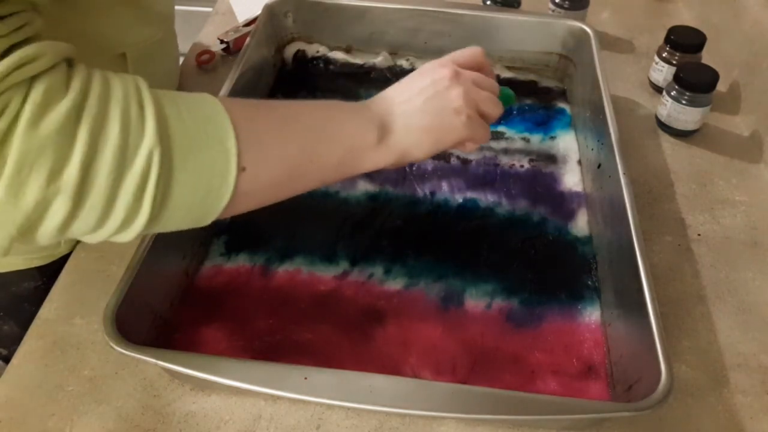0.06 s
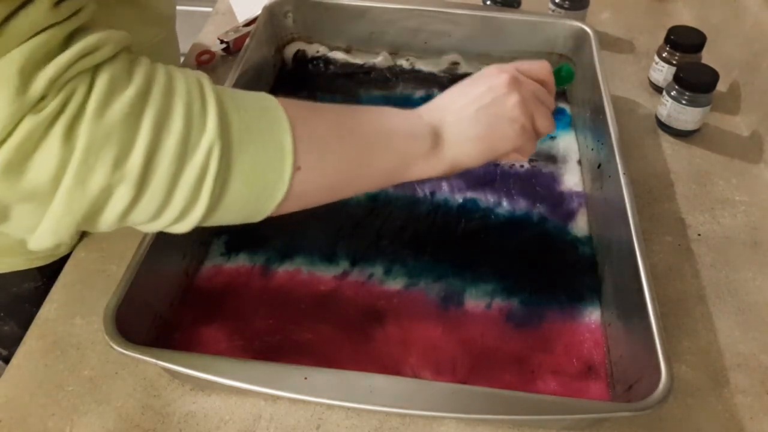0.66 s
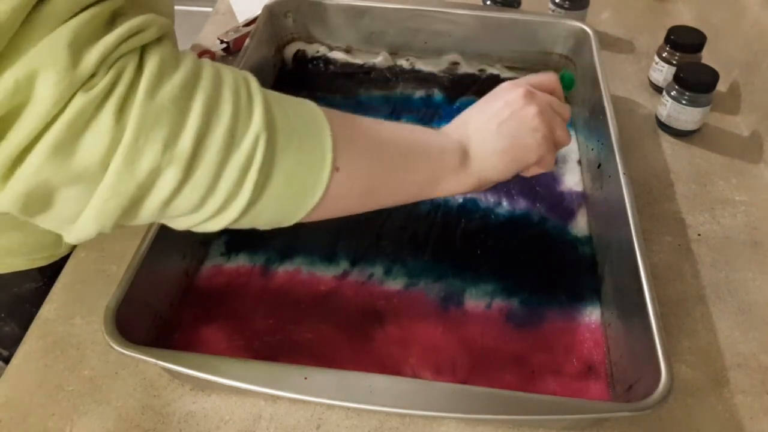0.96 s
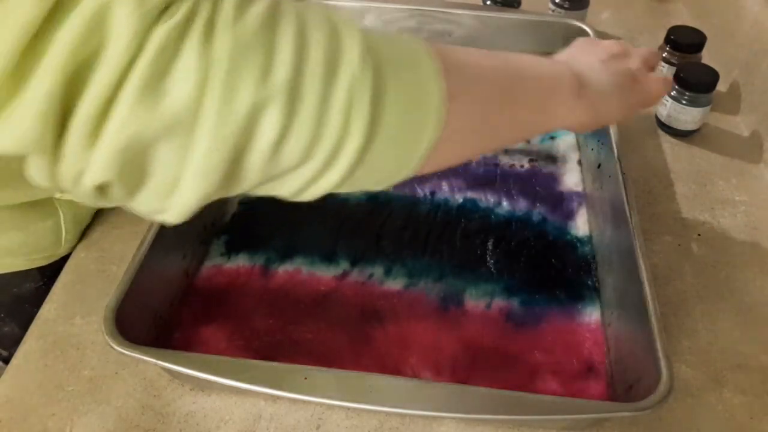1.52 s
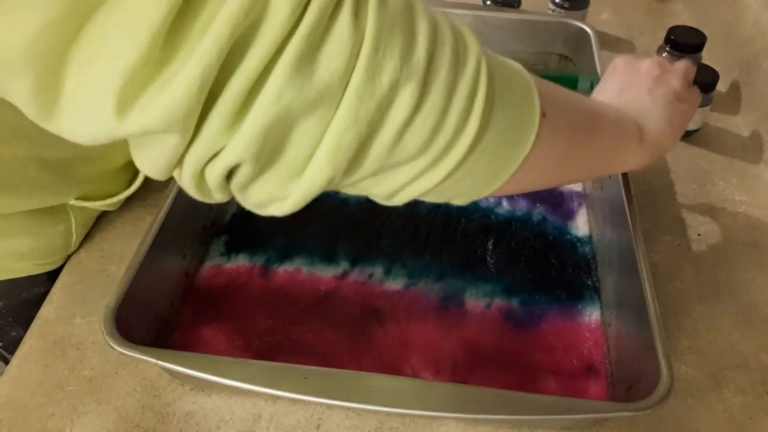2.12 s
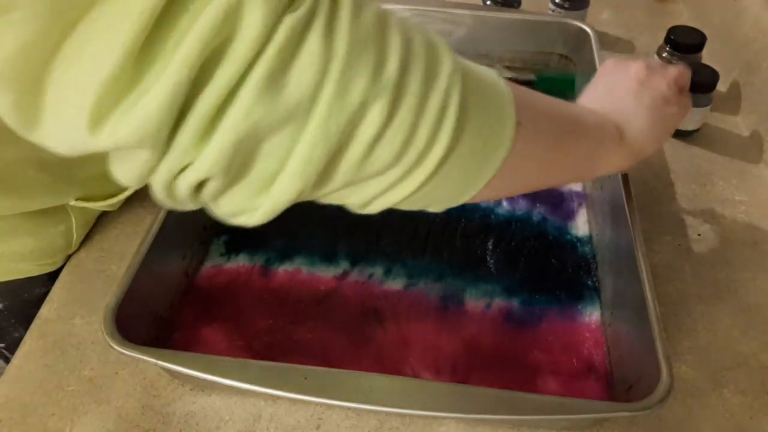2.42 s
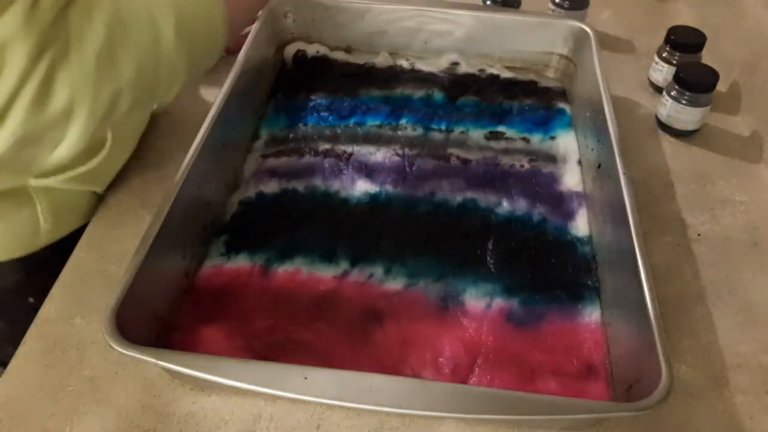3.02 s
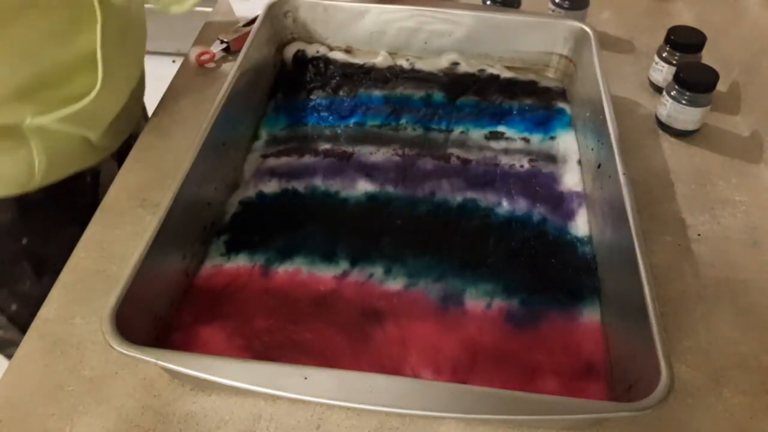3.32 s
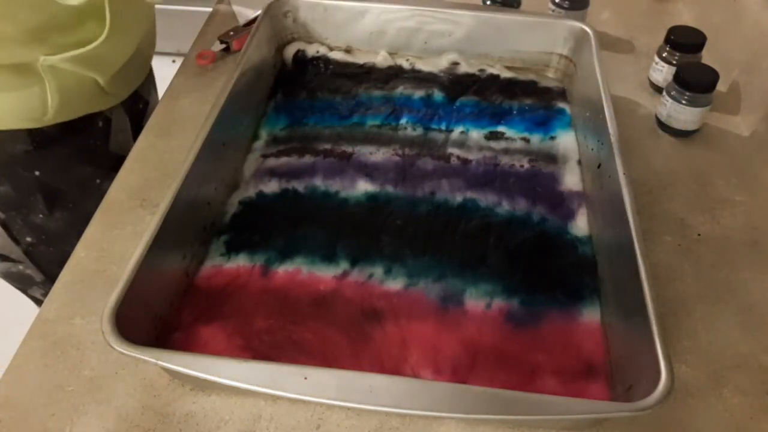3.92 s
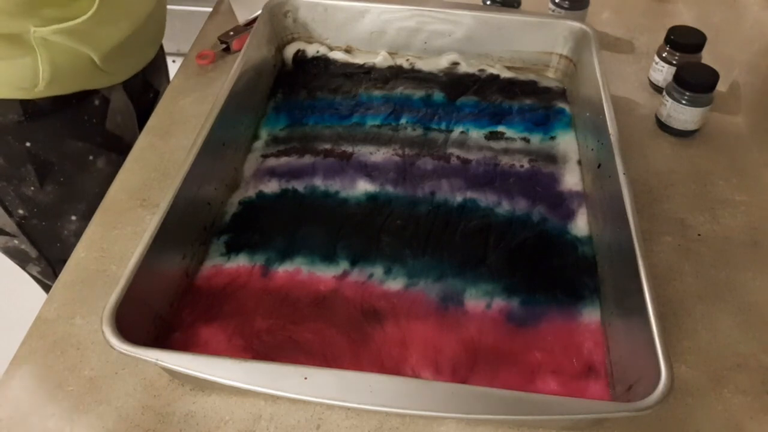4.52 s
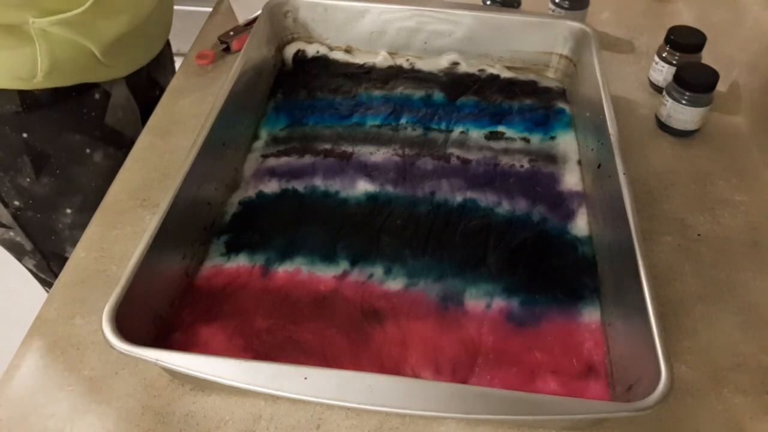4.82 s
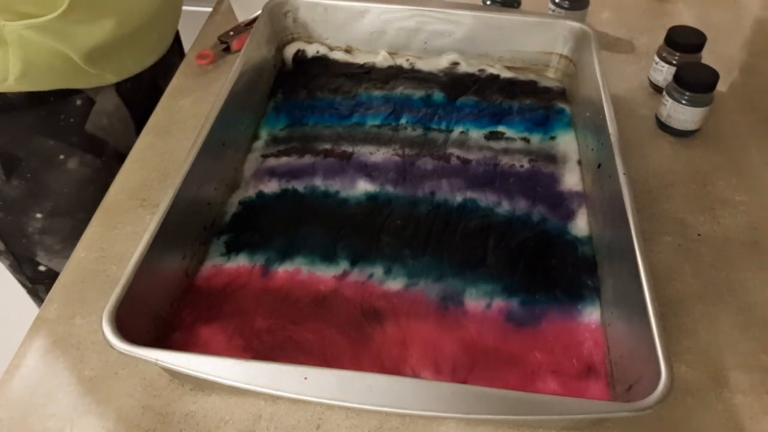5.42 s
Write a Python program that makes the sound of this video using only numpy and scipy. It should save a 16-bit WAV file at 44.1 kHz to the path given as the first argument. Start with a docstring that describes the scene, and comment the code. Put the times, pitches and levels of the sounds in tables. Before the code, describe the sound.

A low rumble and faint electrical hum run throughout in a small, fairly live room. At about 0.9 seconds there is a short, soft swish. From 1.9 to 2.4 seconds a plastic measuring spoon raps four times on the rim of a steel pan, close to the microphone and quickening slightly. These are the loudest sounds: sharp, bright knocks, each with a brief damped metal ring and a little room echo. Clothing rustles faintly afterwards. Near 3.4 seconds comes one crisp, lighter plastic click, farther off and slightly to the right, then a run of small ticks that quicken and fade until about 3.9 seconds, like a jar lid being turned. Another click falls at 4.3 seconds, followed by a cluster of light clicks and short, grainy scrapes from 4.5 to 5.1 seconds as small things are handled. One last click comes at about 5.6 seconds.

```python
"""A short swish, then four sharp raps: a plastic measuring spoon knocks dye powder off on the rim of
a steel pan of wet fiber. Each impact excites damped modes of the spoon, the pan and the table below.
Light clicks and scrapes follow, the impacts and friction of small things handled off to the side.
A small, fairly live room reverberates after each sound, over a low rumble and a faint mains hum."""
import sys
import numpy as np
from scipy import signal
from scipy.fft import rfft, irfft, next_fast_len
from scipy.io import wavfile
from scipy.ndimage import map_coordinates

SR = 44100
rng = np.random.default_rng(int(sys.argv[2]) if len(sys.argv) > 2 else 0)


def wrap_up_sound(samples):
    """Save the sound to the file named by the first command line argument, as 16-bit audio."""
    columns = np.atleast_2d(samples).T
    # keep every value between -1 and 1, then stretch to whole-number steps
    tamed = np.clip(columns, -1, 1)
    steps = np.round(tamed * 32767).astype(np.int16)
    wavfile.write(sys.argv[1], SR, steps)


N = 245221

# raps on the rim: start_s, level_db, low_knock_db, brightness_db
RAPS = [(1.8825, 1, -1, 4.5), (2.0815, 0, -5, 1.5), (2.2342, 1.5, -5.5, 2.5), (2.3689, 3.5, -5, 2.5)]
# spectrum of the contact noise: frequency_hz, level_db
CRACK_SPECTRUM = [(60, -19), (250, -17), (500, -14), (1200, 6.5), (2400, -10.5), (3400, 5.5), (4800, 2),
                  (6800, -10), (8200, -12), (16000, -20)]
# stereo balance of the raps: frequency_hz, left_minus_right_db
RAP_BALANCE = [(200, 0), (700, 3.5), (1290, -1.5), (2400, -3.5), (4000, -1), (5700, -2.5), (7200, -8.5),
               (9000, -3.5), (13000, 2.5)]


def spoon_raps(crack_db=-16, crack_t60_s=0.032, rise_s=0.0015, rebound_s=0.00429, rattle_db=-5,
               sizzle_db=-43, sizzle_t60_s=0.49, room_db=-6.5):
    """Impact excitation: blows on one spot drive the same modes, each with a burst of contact noise."""
    blows, ringing = np.zeros((2, N)), np.zeros((2, N))
    t = np.arange(SR // 2) / SR
    knock = spaced_pair(spoon_knock(t, rebound_s))
    after_ring = spaced_pair(pan_ring(t))
    crack_envelope = amp(crack_db) * fade(t, crack_t60_s) * (1 - np.exp(-t / rise_s))
    shared_grain = noise(CRACK_SPECTRUM, (2, 2, len(t)))
    for start_s, level_db, low_knock_db, brightness_db in RAPS:
        grain = unit(shared_grain + 0.68 * noise(CRACK_SPECTRUM, shared_grain.shape))
        crack, rattle = crack_envelope * grain
        contact = pair(crack + amp(rattle_db) * delay(rattle, rebound_s), ROOM_COHERENCE)
        tilt = [(500, low_knock_db), (1000, 0), (5000, brightness_db)]
        colour = lambda hz: amp(level_db + along(tilt, hz))
        add(blows, start_s, filtered(knock + contact, colour))
        add(ringing, start_s, filtered(after_ring, colour))
        # a faint high sizzle trails each rap
        sizzle = noise([(6500, -27.5), (8500, 0), (16000, -1)], (2, len(t)))
        add(ringing, start_s, amp(level_db + sizzle_db) * fade(t, sizzle_t60_s) * sizzle)
    raps = blows + ringing + amp(room_db) * reverberation(blows)
    return filtered(raps, lambda hz: sides(along(RAP_BALANCE, hz)))


# spoon and rim in contact, damped by the hand: pitch_hz, level_db, t60_s
SPOON_MODES = [(370, -35, 0.025), (535, -19.5, 0.017), (685, -20, 0.031), (1030, -11.5, .017),
               (1268, -19, 0.01524), (1480, -34.5, 0.029), (2109, -29.5, 0.028), (2971, -22.5, 0.026),
               (3510, -21.5, 0.014), (3638, -26, 0.0072), (3950, -20.5, 0.00539), (4600, -18.5, 0.0049),
               (5070, -26.5, 0.017), (6490, -29.5, 0.038)]


def spoon_knock(t, rebound_s, rebound_gain=0.72, split_hz=2500, low_lag_s=0.0008):
    """Dispersion: low bending waves reach the pan's floor after the high ones."""
    low = ring([mode for mode in SPOON_MODES if mode[0] < split_hz], t)
    high = ring([mode for mode in SPOON_MODES if mode[0] >= split_hz], t)
    knock = delay(low, low_lag_s) + high
    return knock - rebound_gain * delay(knock, rebound_s)  # the rebound pushes the other way


# modes of the steel pan: pitch_hz, level_db, t60_s
PAN_MODES = [(370, -10, .18), (393, -10, .18), (509, -3, .33), (565, -2, .22), (630, -8, .22),
             (687, -4, .22), (829, 2, .18), (974, 2, .17), (1034, -3, .2), (1093, 1, .17), (1215, -8, .15),
             (1276, -8, .15), (1504, -11, .19), (2953, -6, .16), (3384, -1, .14), (3568, -4, .15),
             (3615, -6, .17), (3856, -6, .17), (3930, -6, .17), (4132, -6, .16)]
# thud of the table under the pan: pitch_hz, level_db, t60_s
TABLE_MODES = [(67, -47, 0.15), (90, -52.5, 0.3), (137, -42.5, .11), (171.6, -41, 0.17)]


def pan_ring(t, pan_db=-34.5, lag_s=0.0032):
    """Free vibration: the pan, damped by the wet fiber, rings on with the table after a blow."""
    return delay(amp(pan_db) * ring(PAN_MODES, t) + ring(TABLE_MODES, t), lag_s)


# light clicks of hard plastic: start_s, level_db, pitch_hz, ring_db, knock_db
PLASTIC_CLICKS = [(1.442, -70, 2700, -9, 14.5), (3.4488, -24.5, 3930, -12, -26),
                  (3.918, -50.5, 2390, -1, -23), (3.947, -60.5, 1630, 11.5, 7),
                  (4.328, -34, 2670, 9.5, -14), (4.496, -54, 3190, 14, 0), (4.521, -60, 4100, 19, -14),
                  (4.5358, -44, 5350, 13, -7), (4.539, -53, 4030, 19, -11), (4.567, -46, 2790, 12, 5.5),
                  (4.626, -57, 2640, 12, 2), (4.645, -45, 2730, 1.5, -16), (4.665, -40.5, 2460, 5.5, -21),
                  (4.9583, -48, 2320, 10.5, -11), (5.0723, -42, 3000, 3, -14),
                  (5.5545, -35, 2630, 3, -13.5)]
# contact noise of a click: frequency_hz, level_db
SNAP_SPECTRUM = [(200, -49), (800, -10), (1300, -2.5), (2600, -7), (4300, 2.5), (6800, 5.5), (8500, 3.5),
                 (16000, -2.5)]


def plastic_clicks(snap_db=2, snap_t60_s=0.024, ring_t60_s=0.01, overtone_ratio=1.72, overtone_db=-7,
                   knock_hz=720, knock_t60_s=0.0193, rise_s=0.00031, room_db=-1):
    """Heavily damped impacts: each gives a snap of noise, two short plastic modes and a dull knock."""
    clicks, t = np.zeros((2, N)), np.arange(SR // 10) / SR
    attack = 1 - np.exp(-t / rise_s)
    for start_s, level_db, pitch_hz, ring_db, knock_db in PLASTIC_CLICKS + tick_run():
        modes = [(pitch_hz, ring_db, ring_t60_s),
                 (pitch_hz * overtone_ratio, ring_db + overtone_db, ring_t60_s),
                 (knock_hz, knock_db, knock_t60_s)]
        snap = amp(snap_db) * noise(SNAP_SPECTRUM, (2, len(t))) * fade(t, snap_t60_s)
        add(clicks, start_s, amp(level_db) * (snap + ring(modes, t)) * attack)
    return clicks + amp(room_db) * reverberation(clicks)


def tick_run(count=5, start_s=3.591, gap_s=0.078, gap_ratio=0.91, first_db=-43, loss_db=3.5,
             pitch_hz=3700, ring_db=-19, knock_db=-15):
    """Geometric progression: rows of clicks that quicken and fade, as of a jar lid being turned."""
    times_s = [start_s + gap_s * (1 - gap_ratio ** k) / (1 - gap_ratio) for k in range(count)]
    return [(s, first_db - loss_db * k, pitch_hz, ring_db, knock_db) for k, s in enumerate(times_s)]


# strokes of things sliding and scraping: start_s, rise_s, t60_s, level_db
SCRAPE_STROKES = [(.849, 0.021, 0.4, -46.5), (2.76, .09, .8, -61.5), (3.45, 0.16, 2.2, -70),
                  (3.87, .07, .35, -59), (4.43, 0.0361, .4, -59.5), (4.507, 0.03, .11, -45.5),
                  (4.613, 0.018, .4, -54), (4.836, 0.02, .22, -49.5), (4.877, .028, .15, -47.5),
                  (4.947, .025, .45, -53.5), (5.29, .05, .3, -61.5), (5.405, .045, .12, -51.5)]
# spectrum of the friction hiss: frequency_hz, level_db
SCRAPE_SPECTRUM = [(300, -16.5), (700, -3.5), (1000, -8), (1500, -9), (2400, -0.5), (3500, -1), (5000, -1),
                   (6800, -2), (8500, -3), (16000, -6)]


def scrapes(roughness):
    """Sliding friction: tiny slips make a grainy hiss with each stroke."""
    return strokes(SCRAPE_STROKES) * unit(noise(SCRAPE_SPECTRUM, (2, N)) * roughness)


# swells of the soft tone: start_s, level_db
TONE_SWELLS = [(2.62, -65), (3.42, -66), (4.84, -60.5)]


def soft_tone(roughness, pitch_hz=2170, half_width_hz=200, gain_db=-3,
              rise_s=0.042, hold_s=0.13, t60_s=0.65):
    """Narrow-band noise: a soft, slightly rough tone near 2.2 kHz swells and fades."""
    envelope = sum(amp(db) * swell(start_s, rise_s, t60_s, hold_s) for start_s, db in TONE_SWELLS)
    return amp(gain_db) * envelope * unit(noise_band(pitch_hz, half_width_hz) * roughness)


# dull shuffles of sleeve and body: start_s, rise_s, t60_s, level_db
SHUFFLE_STROKES = [(.852, 0.038, 0.48, -60.5), (1.43, 0.011, 0.16, -65.5), (2.5, .2, 1.4, -64.5),
                   (3.29, 0.092, 2.2, -63.5), (4.5, .06, 0.63, -61), (4.61, 0.019, .28, -50.5),
                   (4.8, 0.064, 2.5, -68)]
# spectrum of the shuffles: frequency_hz, level_db
SHUFFLE_SPECTRUM = [(100, -27.5), (350, -8), (560, -3), (800, -4.5), (1200, -16), (3000, -30.5)]
# whispers of the sleeve as the arm moves: start_s, rise_s, t60_s, level_db
SLEEVE_STROKES = [(1.25, .2, 1.7, -78), (2.55, 0.1, 5.9, -73), (3.45, 0.27, 1.5, -69)]


def cloth_rustle(shuffle_db=-4, whisper_hz=6900, half_width_hz=750):
    """Friction noise of cloth: dull shuffles and a high whisper swell as the body moves."""
    shuffle = amp(shuffle_db) * strokes(SHUFFLE_STROKES) * noise(SHUFFLE_SPECTRUM, (2, N))
    whisper = strokes(SLEEVE_STROKES) * noise_band(whisper_hz, half_width_hz)
    return shuffle + whisper


def quiet_sounds(roughness_db=3.0, roughness_rate_hz=300, room_db=-2):
    """Amplitude modulation: one fast flicker roughens scrapes and tone; cloth and room are added."""
    roughness = amp(roughness_db * wobble(roughness_rate_hz))
    direct = scrapes(roughness) + soft_tone(roughness) + cloth_rustle()
    return direct + amp(room_db) * reverberation(direct)


# reverberation time of the room: frequency_hz, t60_s
ROOM_DECAY = [(100, 0.46), (500, 0.4), (1000, 0.4), (2200, 0.38), (4000, 0.49), (7000, .4), (14000, 0.13)]
# spectrum of the reflections: frequency_hz, level_db
ROOM_SPECTRUM = [(100, 5), (500, 10.5), (1000, -5.5), (2000, 5.5), (3000, -3.5), (3900, -3), (5200, -1.5),
                 (7000, -2), (9000, 7.5), (14000, 5)]
# likeness of left and right in the room: frequency_hz, coherence
ROOM_COHERENCE = [(130, 0.96), (300, 0.056), (800, 0.32), (2000, 0)]


def reverberation(x, gap_s=0.0077, early_db=4, early_t60_s=0.093):
    """Reflection and absorption: dense echoes from table and walls, each band dying at its own rate."""
    diffuse = pair(rng.standard_normal((2, SR * 3 // 4)), ROOM_COHERENCE)
    hz, frame_s, bands = signal.stft(diffuse, SR, nperseg=256)
    decay = fade(frame_s, along(ROOM_DECAY, hz)[:, None])
    colour = amp(along(ROOM_SPECTRUM, hz))[:, None]
    _, tail = signal.istft(bands * decay * colour, SR, nperseg=256)
    t = np.arange(tail.shape[1]) / SR
    early_boost = 1 + amp(early_db) * fade(t, early_t60_s)
    onset = np.clip(t / gap_s - 0.5, 0, 1)
    response = tail * early_boost * onset
    return signal.fftconvolve(x, response / np.linalg.norm(response[0]), axes=1)[:, :x.shape[-1]]


# steady noise of the room: frequency_hz, level_db
AMBIENT_SPECTRUM = [(15, -78), (25, -38.5), (53, -32.5), (71, -12.5), (122, -7.5), (148, -12.5), (183, -11),
                    (297, -18.5), (359, -14), (495, -23.5), (741, -26), (950, -35.5), (1410, -33),
                    (1660, -31.5), (2650, -36.5), (3100, -33), (3800, -41.5), (15500, -43)]
# likeness of its left and right, negatives taken as zero: frequency_hz, coherence
AMBIENT_COHERENCE = [(60, 1), (180, 0.9), (550, 0.4), (1650, -0.28), (4970, -1.3), (15000, 0.2)]
# its stereo balance: frequency_hz, left_minus_right_db
AMBIENT_BALANCE = [(60, 2), (110, -1.5), (200, 3.5), (380, -2.5), (700, 8), (1290, -1), (2380, -1),
                   (4400, 1), (8120, -3), (15000, 2.5)]


def ambient_noise(level_db=-62):
    """Stationary noise: a low rumble, alike on both sides, and a faint incoherent hiss."""
    air = pair(noise(AMBIENT_SPECTRUM, (2, N)), AMBIENT_COHERENCE)
    return amp(level_db) * unit(filtered(air, lambda hz: sides(along(AMBIENT_BALANCE, hz))))


def mains_hum(level_db=-64, pitch_hz=120, drift_rad=0.46):
    """Phase modulation: a slow random drift makes the hum waver a little."""
    phase = 2 * np.pi * pitch_hz * np.arange(N) / SR + drift_rad * wobble(20)
    return amp(level_db) * unit(np.sin(phase))


def amp(db):
    """Decibels as an amplitude ratio."""
    return 10 ** (np.asarray(db) / 20)


def unit(x):
    """Normalisation to rms 1."""
    return x / np.sqrt(np.mean(x ** 2) + 1e-20)


def along(points, hz):
    """Interpolation of (frequency_hz, value) points on a log frequency axis."""
    frequencies, values = np.transpose(points)
    return np.interp(np.log(hz + 1), np.log(frequencies + 1), values)


def wobble(rate_hz):
    """A smooth random curve with rate_hz knots a second."""
    knots = rng.standard_normal(int(N * rate_hz / SR) + 4)
    return map_coordinates(knots, [np.arange(N) * rate_hz / SR])


def filtered(x, response):
    """Linear filtering: the spectrum of x times a complex frequency response."""
    n = x.shape[-1]
    padded = next_fast_len(n + SR // 10)
    return irfft(rfft(x, padded) * response(np.fft.rfftfreq(padded, 1 / SR)), padded)[..., :n]


def delay(x, lag_s):
    """Delay as a linear phase shift."""
    return filtered(x, lambda hz: np.exp(-2j * np.pi * hz * lag_s))


def noise(spectrum, shape):
    """Coloured noise of rms 1."""
    return unit(filtered(rng.standard_normal(shape), lambda hz: amp(along(spectrum, hz))))


def noise_band(centre_hz, half_width_hz):
    """Stereo noise of rms 1 in one narrow band."""
    peak = lambda hz: 1 / (1 + ((hz - centre_hz) / half_width_hz) ** 2)
    return unit(filtered(rng.standard_normal((2, N)), peak))


def fade(t, t60_s):
    """Exponential decay, 60 dB in t60_s."""
    return np.exp(-np.log(1000) * t / t60_s)


def ring(modes, t):
    """Modal superposition: damped sines, neighbours in opposite sign."""
    return sum((-1) ** k * amp(db) * fade(t, t60_s) * np.sin(2 * np.pi * hz * t)
               for k, (hz, db, t60_s) in enumerate(modes))


def swell(start_s, rise_s, t60_s, hold_s=0):
    """Envelope: a smooth rise, a hold and an exponential release."""
    t = np.arange(N) / SR - start_s
    attack = np.sin(np.pi / 2 * np.clip(t / rise_s, 0, 1)) ** 2
    return attack * fade(np.maximum(t - rise_s - hold_s, 0), t60_s)


def strokes(rows):
    """Incoherent summation: the envelope of overlapping strokes, whose powers add."""
    return np.sqrt(sum((amp(db) * swell(*timing)) ** 2 for *timing, db in rows))


def sides(db):
    """Left and right gains for a level difference."""
    return amp(np.array([[0.5], [-0.5]]) * db)


def spaced_pair(x, lag_s=0.00022):
    """Arrival time difference: the right channel lags the left."""
    return np.array([x, delay(x, lag_s)])


def pair(x, coherence):
    """Mid-side mixing: two unrelated signals become left and right of the given coherence."""
    angle = lambda hz: np.arccos(np.clip(along(coherence, hz), 0, 1)) / 2
    mid, side = filtered(x, lambda hz: np.array([np.cos(angle(hz)), np.sin(angle(hz))]))
    return np.array([mid + side, mid - side])


def add(track, start_s, sound):
    """Mix a sound into the track at start_s."""
    part = track[:, round(start_s * SR):][:, :sound.shape[-1]]
    part += sound[..., :part.shape[-1]]


# response of the microphones: frequency_hz, gain_db
MIC_RESPONSE = [(30, -10), (55, 3), (6800, -1), (7500, -7.5), (8300, -18), (11000, -17.5), (16000, -17)]


def scene():
    """Superposition: close raps, handling farther off and a little to the right, and the background."""
    sounds = spoon_raps() + (plastic_clicks() + quiet_sounds()) * sides(-0.83)
    return filtered(sounds, lambda hz: amp(along(MIC_RESPONSE, hz))) + ambient_noise() + mains_hum()


def record(dry, cutoff_hz=16000):
    """Band limiting: an ideal low-pass filter removes everything above the cutoff."""
    return filtered(dry, lambda hz: hz < cutoff_hz)


dry = scene()
out = record(dry)
wrap_up_sound(out)
```